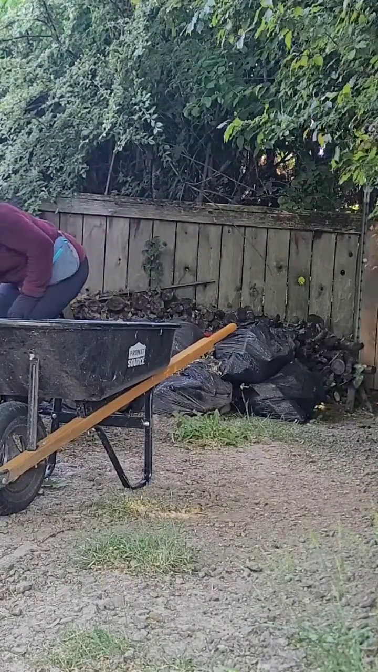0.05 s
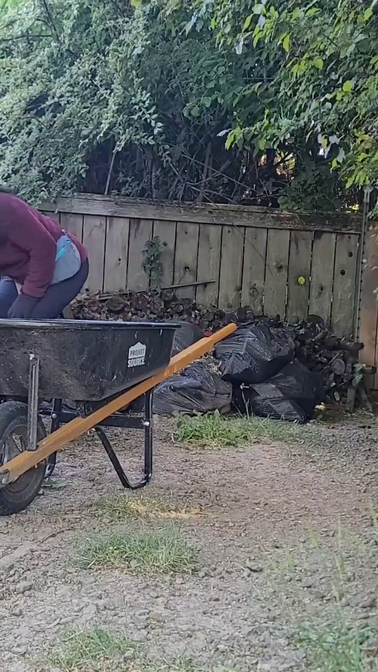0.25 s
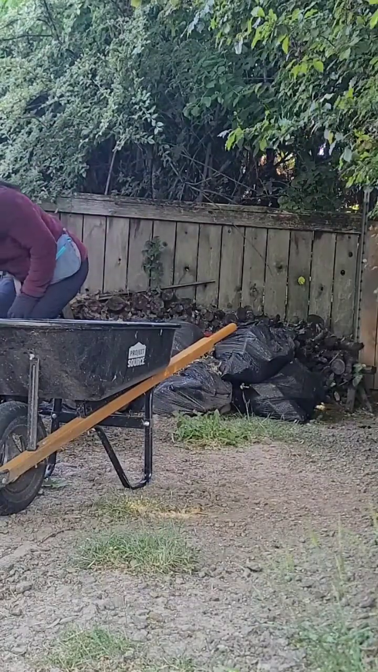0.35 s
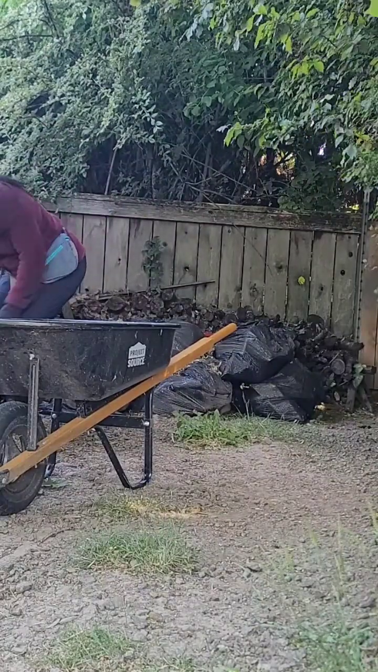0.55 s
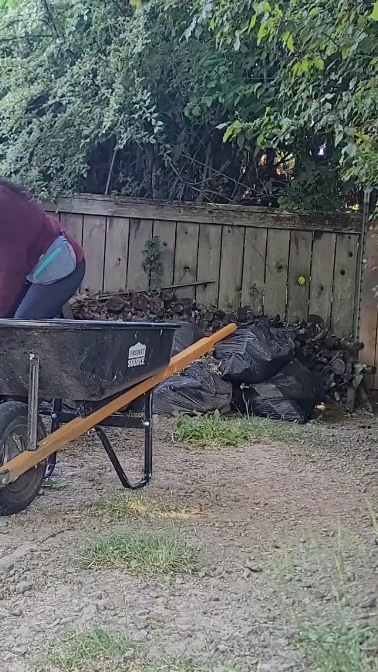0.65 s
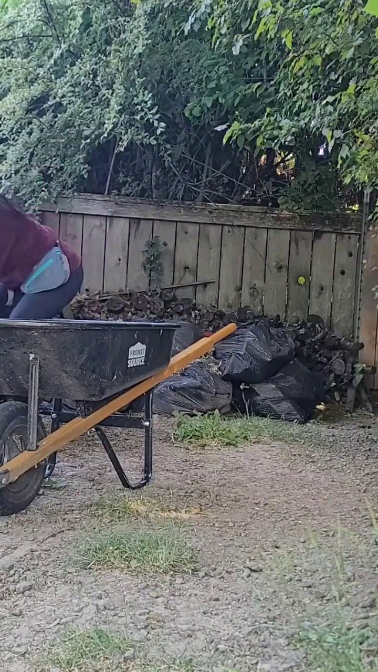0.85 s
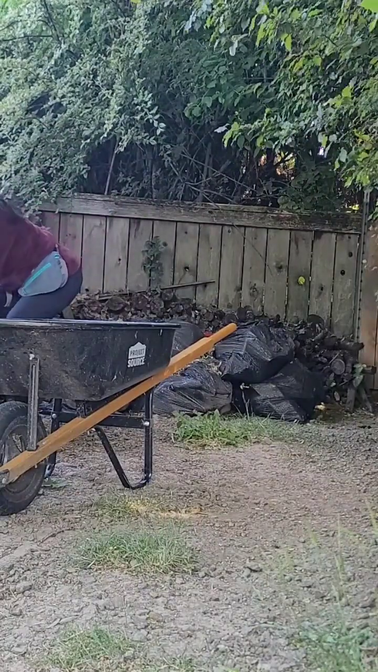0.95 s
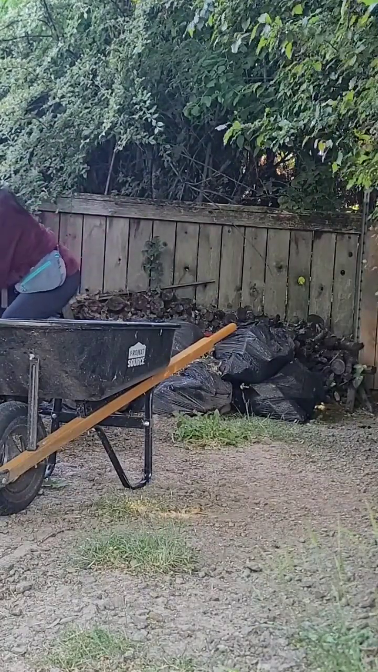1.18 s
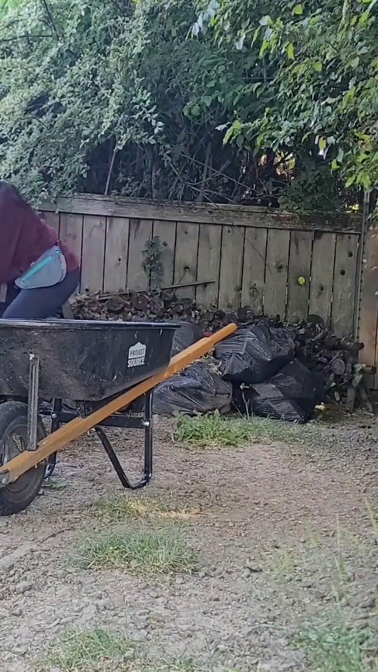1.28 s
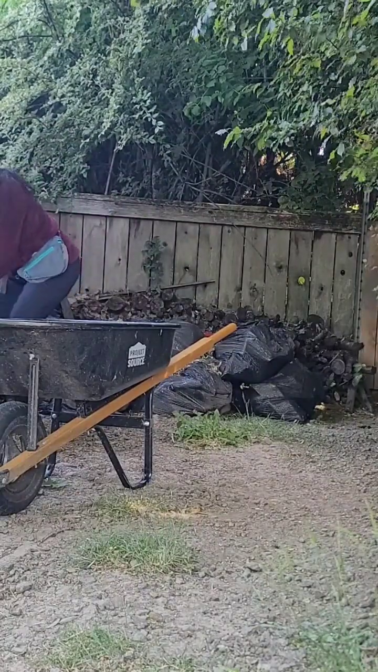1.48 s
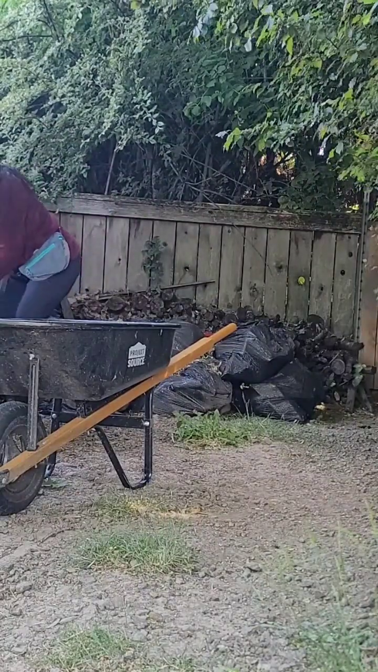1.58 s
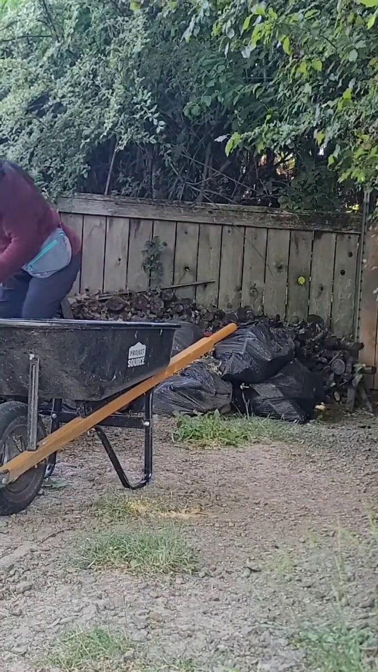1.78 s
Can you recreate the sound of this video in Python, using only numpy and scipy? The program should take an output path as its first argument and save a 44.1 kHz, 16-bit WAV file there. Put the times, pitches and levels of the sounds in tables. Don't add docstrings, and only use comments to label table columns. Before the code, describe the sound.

Plastic bags of empty cans crackle and clatter in rough bursts, close by in a yard

```python
import sys
import numpy as np
from scipy import signal
from scipy.fft import rfft, irfft
from scipy.io import wavfile
from scipy.ndimage import uniform_filter1d

SR = 44100
rng = np.random.default_rng(int(sys.argv[2]) if len(sys.argv) > 2 else 0)


def put_to_file(sound):
    columns = np.atleast_2d(sound).T
    safe = np.clip(columns, -1, 1)
    whole_steps = np.round(safe * 32767)
    wavfile.write(sys.argv[1], SR, whole_steps.astype(np.int16))


def undo_db(level):
    steps = np.asarray(level, float) / 20
    return 10 ** steps


N = 81585

# time in seconds, level in dB, weight of cans against film in dB.
PULL = [(0.0, -44.5, 2), (0.138, -57.5, 20.5), (0.282, -22.5, -3.5), (0.412, -25, 1.5),
        (0.468, -17.5, -1.5), (0.57, -22, -3.5), (0.632, -29.5, -0.5), (0.694, -38, -8.5), (0.88, -69, 29),
        (1.01, -24, 4), (1.204, -50, -2), (1.386, -56.5, -4), (1.59, -52, -12), (1.72, -61, -2),
        (1.85, -72, 13.5)]
# start in seconds, peak in dB, weight of cans in dB, T60 in seconds.
JOLTS = [(0.058, -23, 7, 0.49), (0.226, -11, 0.5, 0.26), (0.298, -17, -23.5, 0.19),
         (0.334, -16.5, -25, 0.062), (0.463, -22, 11, 0.044), (0.5, -14, -11, 0.39), (0.771, -23, 8, 0.051),
         (0.851, -29.5, -9, 0.36), (0.876, -17, 6, 0.12), (0.902, -11, 3, 0.44), (1.027, -7.5, 4.5, 0.32),
         (1.055, -7.5, 5, 0.32), (1.097, -12.5, -4.5, 0.19), (1.213, -22.5, 10, 0.16),
         (1.259, -23.5, 9, 0.38), (1.289, -22, 12, 0.17), (1.315, -38.5, -14, 0.28), (1.449, -15, 3, 0.4),
         (1.49, -12, 10.5, 0.19), (1.546, -20.5, 10, 0.056), (1.624, -31, 10, 0.06), (1.68, -28, 11, 0.091),
         (1.698, -30, 4, 0.16)]
# start in seconds, peak in dB, weight of cans in dB, T60 in seconds.
SWELLS = [(0.116, -16.5, 4, 0.32), (0.24, -11.5, -4, 0.3), (0.395, -8.5, -6, 0.3), (0.428, -4.5, 2, 0.18),
          (0.545, -14, 0, .15), (0.778, -20, 10, 0.44), (0.925, -13, -1.5, 0.16), (0.955, -10, -3, 0.25),
          (1.431, -15, 13.5, 0.15), (1.483, -16, 10, 0.08), (1.71, -37, -5, 0.17)]
# frequency in Hz, level in dB.
FILM_COLOUR = [(700, -25), (1500, -9.5), (2800, -13.5), (4500, -8.5), (6500, -5.5), (9000, -14),
               (12000, -10.5), (16000, -9.5)]
# frequency in Hz, level in dB.
CAN_COLOUR = [(120, -26.5), (250, -26), (420, -13.5), (750, -6.5), (1350, 2.5), (1900, 5), (2600, -8),
              (5000, -30)]
# frequency in Hz, level in dB, T60 in seconds.
WALL_MODES = [(182, -7, .1), (712, -24, .04), (1290, -9, .03), (1725, -8, .03), (3450, -6, .02),
              (3560, -4, .022), (3670, -5, .02), (3830, -8, .02), (5105, -6, .03), (5220, -5, .03),
              (5670, -7, .03), (6115, -5, .04), (8500, -15, .03), (9137, -15, .04)]
# frequency in Hz, level in dB.
TRAFFIC_COLOUR = [(20, -13), (40, -15), (70, -1), (100, -14.5), (200, -22), (500, -43.5), (5000, -42.5),
                  (16000, -49)]
# start in seconds, frequency in Hz,
# peak in dB, T60 in seconds.
TAPS = [(1.128, 495, -20, 0.07), (0.4, 712, -22.5, 0.19), (1.04, 1400, -15, 0.076), (1.1, 1400, -16, .04),
        (1.2, 472, -24.5, 0.064), (1.435, 1400, -19, .04), (.903, 6100, -22.5, .03), (.853, 6400, -32, .1),
        (.93, 5170, -23, 0.07), (.49, 8900, -22, .06), (1.7, 1490, -42, 0.049), (1.175, 595.4, -26.5, 0.19),
        (1.214, 7220, -29.5, 0.091), (1.214, 3040, -32, .04), (1.1, 460, -24.5, 0.025),
        (1.9, 4750, -36, 0.055), (1.25, 370, -25, 0.065), (1.15, 330, -35, 0.11), (1.09, 405, -28, 0.11),
        (2, 745, -32, 0.083), (1.2, 410, -31.5, 0.065), (1.31, 440, -37, .06), (1.6, 525, -32, .07),
        (1.318, 5200, -36, 0.084), (1.371, 413, -30, 0.06), (1.9, 784, -40, 0.046),
        (1.68, 2000, -29, 0.044), (1.70, 792, -37, 0.091), (1.7, 1290, -24.5, 0.044),
        (1.679, 830, -36, 0.044), (0.546, 188.2, -30, 0.39),
        (1.452, 830, -18, 0.049), (1.452, 1410, -12.5, 0.05), (1.454, 1980, -20, .04),
          (1.491, 1500, -19, 0.072), (1.493, 1960, -18, 0.034), (1.679, 1690, -33.5, 0.042),
          (1.218, 242, -29.5, 0.13), (.06, 2200, -25, 0.03), (.06, 2000, -28, .025), (.905, 92, -30, .15),
          (1.626, 1350, -38, .04), (1.46, 1150, -18, .05), (1.5, 1400, -18, .06), (1.546, 950, -27, .03),
          (0.228, 1300, -17, 0.16), (0.28, 1290, -21, 0.092), (.121, 1680, -23, 0.055),
          (0.11, 1020, -28, 0.13), (0.1, 1300, -25, .08), (.26, 2900, -21.5, .06), (.25, 3660, -23, .1),
          (.297, 3590, -21, 0.13), (0.29, 3620, -29.5, .1), (0.59, 7300, -24, .08), (.59, 5100, -19, .08),
          (1.025, 850, -20, 0.066), (1.08, 1100, -20, 0.081), (1.546, 1340, -19, 0.037),
          (1.702, 4900, -45, 0.087), (0.79, 6560, -34.5, 0.14), (1.031, 1800, -7.5, 0.052)]
# time in seconds, level in dB.
RUB = [
    (1.08, -58),
    (1.13, -55),
    (1.22, -50),
    (1.3, -48),
    (1.38, -46),
    (1.5, -49),
    (1.57, -80),
]
# frequency in Hz, phase lag in radians.
PORT_LAG = [(60, 0.031), (350, 0.52), (1000, 1.83), (2400, 2.04), (3800, 2.96), (5900, 5.15), (7200, 4.56),
            (16000, 16.5)]
# frequency in Hz, level in dB.
PORT_TILT = [(60, -7.5), (250, -0.5), (700, 0.5), (1500, 3), (2500, 1), (4400, -1.3), (8100, 1.5),
             (15000, -0.5)]
# frequency in Hz, level in dB.
SCATTER = [(100, -19), (300, -10), (1000, -3.5), (3000, -4), (7000, -1), (12000, 5)]
# frequency in Hz, width in Hz, gain in dB.
HOUSING = [(264.4, 60, -8), (575, 157, -2.5), (3130, 233, -2), (3622, 700, 18.5), (4580, 500, -5),
           (5186, 530, 10), (6030, 620, 5.5), (8896, 490, 9.5), (10130, 4300, 6.5),
           (7600, 520, -11), (9800, 440, -18), (11800, 800, -18), (12400, 800, -18), (15500, 500, -7)]


def rms(x):
    return np.sqrt(np.mean(x ** 2))


def rms_one(x):
    return x / np.sqrt(np.mean(x ** 2) + 1e-20)


def time_since(start_s):
    return np.maximum(np.arange(N) / SR - start_s, 0)


def in_time(rows):
    times, *columns = np.transpose(rows)
    return [np.interp(np.arange(N) / SR, times, column) for column in columns]


def at_hz(points):
    bins = np.maximum(np.arange(N // 2 + 1) * SR / N, 1)
    hz, values = np.transpose(points)
    return np.interp(np.log(bins), np.log(hz), values)


def colour(x, points):
    return irfft(rfft(x) * undo_db(at_hz(points)), N)


def filtered(x, order, hz, kind):
    return signal.sosfilt(signal.butter(order, hz, kind, fs=SR, output="sos"), x)


def drift(rate_hz):
    r = np.exp(-2 * np.pi * rate_hz / SR)
    noise = rng.standard_normal(N + SR)
    return rms_one(signal.lfilter([1], [1, -2 * r, r * r], noise)[SR:])


def ring(train, hz, t60):
    r = undo_db(-60 / (t60 * SR))
    w = 2 * np.pi * hz / SR
    return signal.lfilter([0, np.sin(w)], [1, -2 * r * np.cos(w), r * r], train + 1e-18)


def clicks(per_s, spread_db):
    sizes = undo_db(spread_db * np.minimum(rng.exponential(1, N), 3.2))
    signs = rng.choice([-1, 1], N)
    return rms_one(sizes * signs * (rng.random(N) < per_s / SR))


def drives():
    level_db, weight_db = in_time(PULL)
    film = undo_db(2 * level_db)
    cans = undo_db(2 * (level_db + weight_db))
    for rows, attack_s in ((JOLTS, .0015), (SWELLS, .01)):
        for start_s, peak_db, can_db, t60 in rows:
            t = time_since(start_s)
            rise = np.minimum(t / attack_s, 1)
            power = rise * undo_db(2 * (peak_db - 13.5 - 60 * t / t60))
            film = film + power * undo_db(-can_db)
            cans = cans + power * undo_db(can_db)
    return np.sqrt(film), np.sqrt(cans)


def grains(drive, per_s, spread_db, cycles, spectrum, count):
    clumps = undo_db(1.6 * drift(40))
    train = clicks(per_s, spread_db) * clumps * drive
    dealt = rng.integers(0, count, N)
    pitches = np.geomspace(spectrum[0][0], min(spectrum[-1][0], .36 * SR), count)
    rings = sum(ring(train * (dealt == k), hz, cycles / hz) for k, hz in enumerate(pitches))
    return rms_one(colour(rings, spectrum)) * rms(drive)


def film_crackle(drive):
    return undo_db(1) * grains(drive, 7000, spread_db=2.7, cycles=5, spectrum=FILM_COLOUR, count=30)


def can_tumble(drive):
    return undo_db(-1.5) * grains(drive, 3400, spread_db=2, cycles=9, spectrum=CAN_COLOUR, count=24)


def can_walls(drive):
    out = np.zeros(N)
    for hz, db, t60 in WALL_MODES:
        out += undo_db(db) * ring(clicks(per_s=200, spread_db=4) * drive, hz, t60)
    return undo_db(-13) * rms_one(out) * rms(drive)


def traffic():
    mid, side = [colour(noise, TRAFFIC_COLOUR) for noise in rng.standard_normal((2, N))]
    level_db = -49.5 + 0.65 * drift(4.5)
    return undo_db(level_db) * rms_one(mid + 0.21 * side * [[1], [-1]])


def load_shift(drive):
    lag_s = .06
    r = np.exp(-1 / (lag_s * SR))
    slow_drive = signal.lfilter([1 - r], [1, -r], drive)
    rumble = filtered(rng.standard_normal(N), 2, [55, 131], "band")
    return undo_db(-24) * slow_drive * rms_one(rumble)


def taps():
    out = np.zeros(N)
    for start_s, hz, peak_db, t60 in TAPS:
        t = time_since(start_s)
        rise = np.minimum(t * hz / 1.5, 1)
        out += undo_db(peak_db - 60 * t / t60) * rise * np.sin(2 * np.pi * hz * t)
    return out


def rub():
    level_db = in_time(RUB)[0] + 2 * drift(23)
    scuffs = filtered(clicks(340, spread_db=-0.5), 2, [350, 620], "band")
    return undo_db(level_db) * rms_one(scuffs)


def fold():
    start_s, hold_s, t60 = 1.358, 0.014, 0.21
    t = np.arange(N) / SR - start_s
    level = (t > 0) * undo_db(-35 - 60 * np.maximum(t - hold_s, 0) / t60)
    return level * filtered(rng.standard_normal((2, N)), 2, 5260, "high")


def bags(film, cans):
    return film_crackle(film) + can_tumble(cans) + can_walls(film) + rub()


def ports(shared, own):
    side = np.array([[.5], [-.5]])
    direct = rfft(shared) * np.exp(1j * side * at_hz(PORT_LAG))
    scattered = rfft(own) * undo_db(at_hz(SCATTER))
    balance = undo_db(side * at_hz(PORT_TILT)) / np.sqrt(1 + undo_db(2 * at_hz(SCATTER)))
    both = irfft((direct + scattered) * balance, N)
    t = np.arange(SR // 4) / SR
    tails = rng.standard_normal((2, len(t))) * undo_db(-60 * t / .06)
    echoes = signal.fftconvolve(both, rms_one(tails) / np.sqrt(len(t)), axes=1)[:, :N]
    return both + undo_db(-12) * echoes


def housing(x):
    for hz, width_hz, db in HOUSING:
        w, g = 2 * np.pi * hz / SR, undo_db(db / 2)
        a = np.sin(w) * width_hz / hz / 2
        middle = -2 * np.cos(w)
        x = signal.lfilter([1 + a * g, middle, 1 - a * g], [1 + a / g, middle, 1 - a / g], x)
    return x


def scene():
    film, cans = drives()
    shared, left, right = [bags(film, cans) for _ in range(3)]
    near = housing(ports(shared + taps(), np.array([left, right])))
    return filtered(near, 2, 110, "high") + fold() + traffic() + load_shift(film)


def drop_masked(x):
    hz, _, spec = signal.stft(x, SR, nperseg=2048)
    power = np.sum(np.abs(spec) ** 2, axis=0)
    bands = np.repeat(power[:1024].reshape(64, 16, -1).mean(axis=1), 16, axis=0)
    around = uniform_filter1d(power, size=200, axis=0)[:1024]
    wobble = uniform_filter1d(rng.standard_normal((64, power.shape[1])), size=6, axis=1)
    wobble = uniform_filter1d(wobble, size=3, axis=0)
    limit_db = -9.5 + 13 * np.repeat(wobble, 16, axis=0)
    keep = (bands > around * undo_db(2 * limit_db)) | (hz[:1024, None] < 6500)
    keep = np.vstack([keep, keep[-1:]])
    return signal.istft(spec * keep, SR, nperseg=2048)[1][:, :N]


def low_pass(x):
    return signal.sosfilt(signal.butter(12, 16310, fs=SR, output="sos"), x)


def record(dry):
    rounded = np.tanh(dry / 1.5) * 1.5
    top_cut = signal.ellip(10, .5, 70, 15680, fs=SR, output="sos")
    mix = drop_masked(signal.sosfilt(top_cut, rounded))
    return low_pass(np.clip(mix, -1, 1))


dry = scene()
out = record(dry)
put_to_file(out)
```